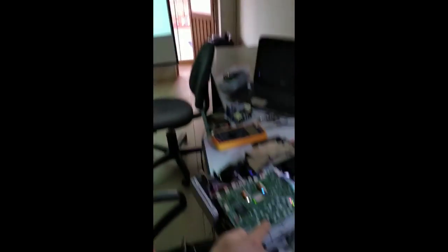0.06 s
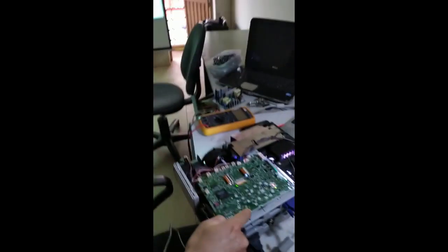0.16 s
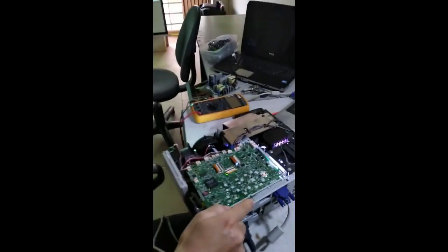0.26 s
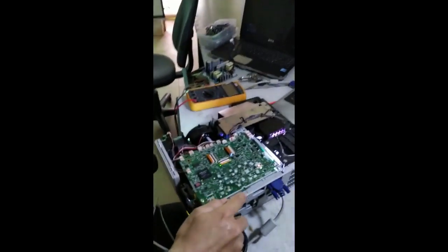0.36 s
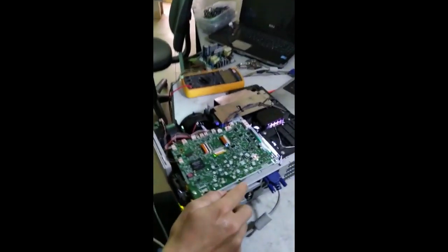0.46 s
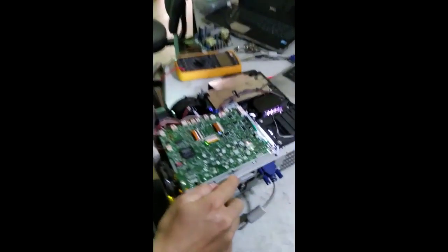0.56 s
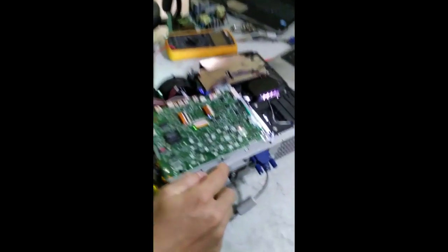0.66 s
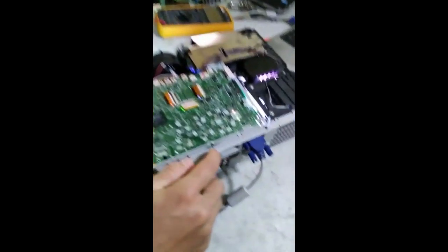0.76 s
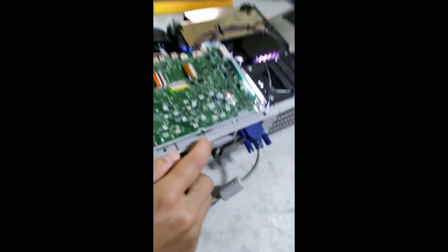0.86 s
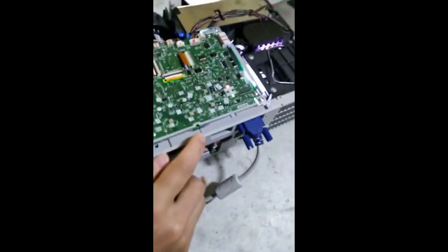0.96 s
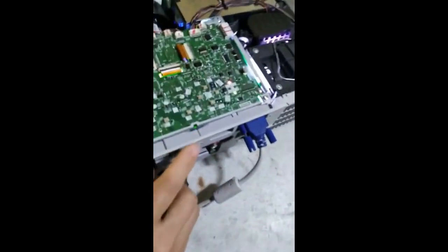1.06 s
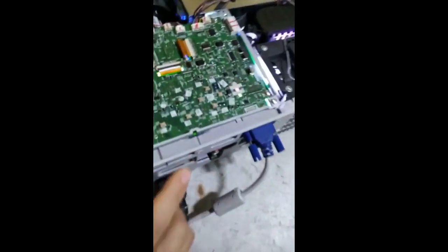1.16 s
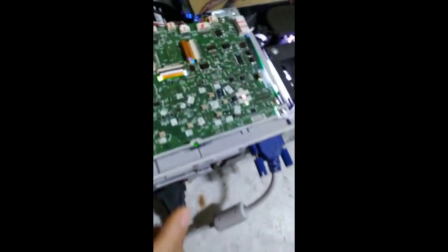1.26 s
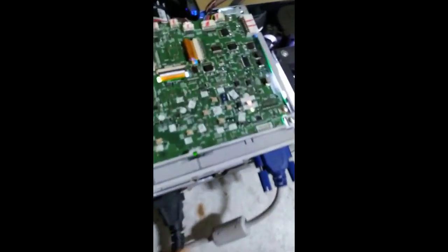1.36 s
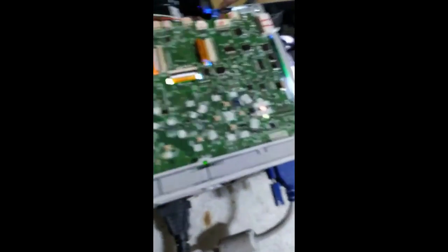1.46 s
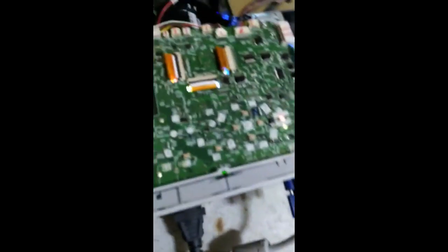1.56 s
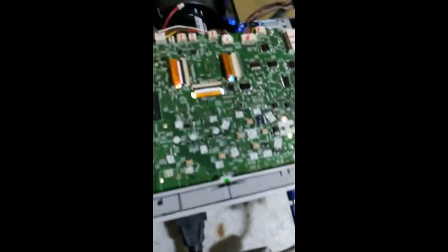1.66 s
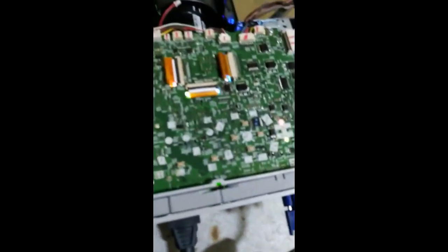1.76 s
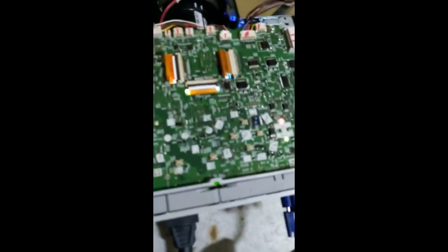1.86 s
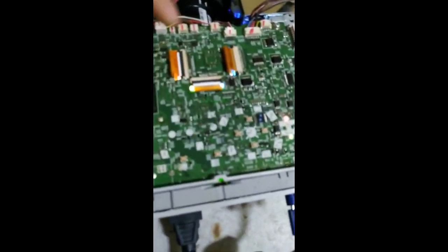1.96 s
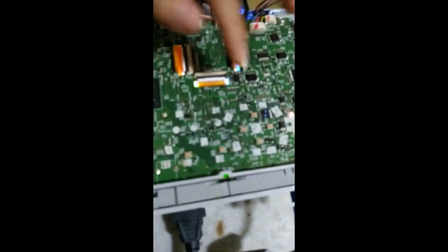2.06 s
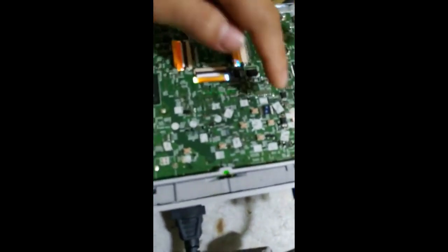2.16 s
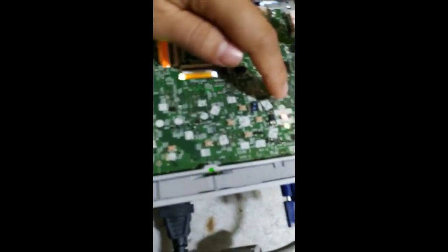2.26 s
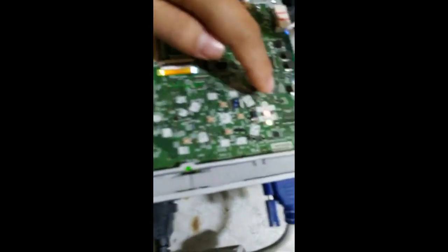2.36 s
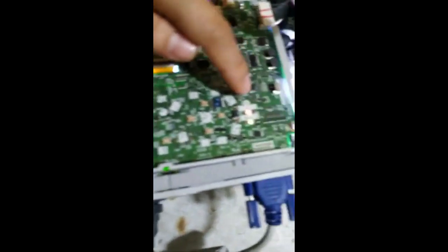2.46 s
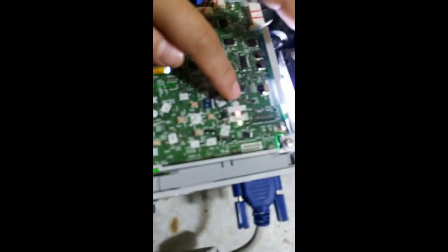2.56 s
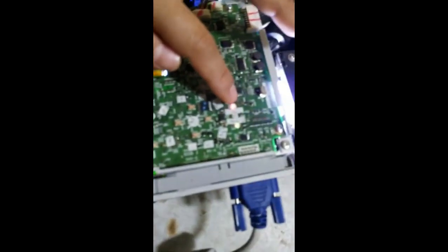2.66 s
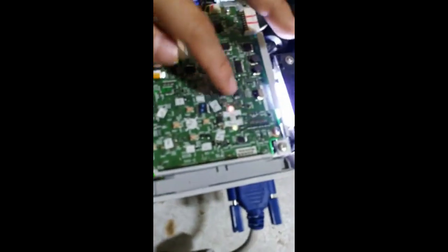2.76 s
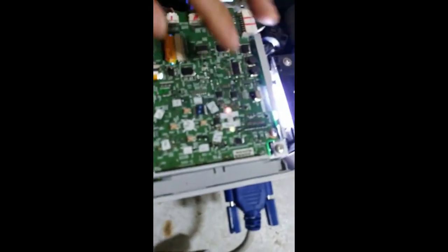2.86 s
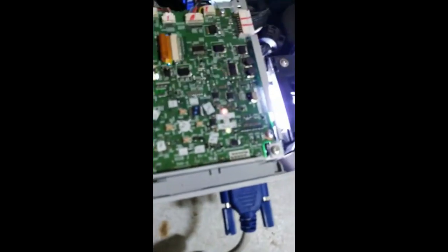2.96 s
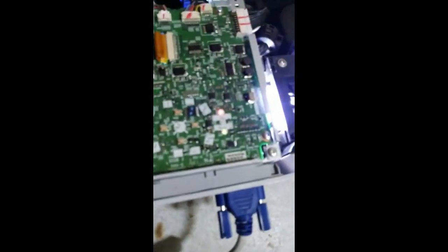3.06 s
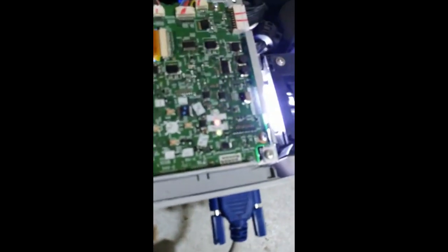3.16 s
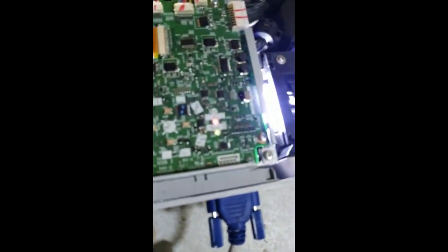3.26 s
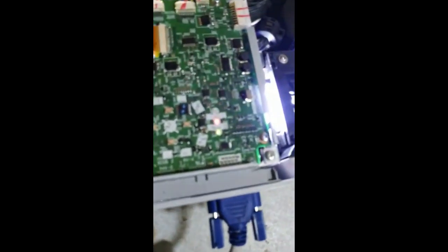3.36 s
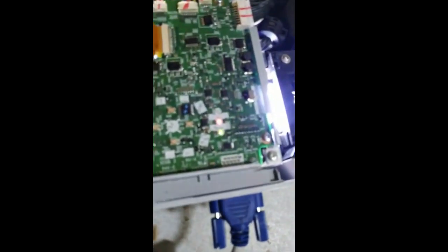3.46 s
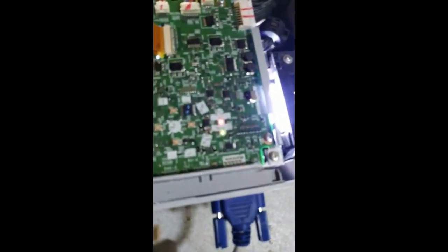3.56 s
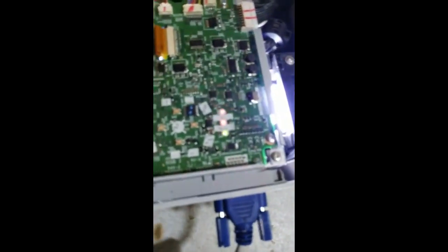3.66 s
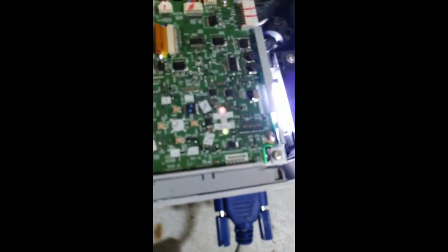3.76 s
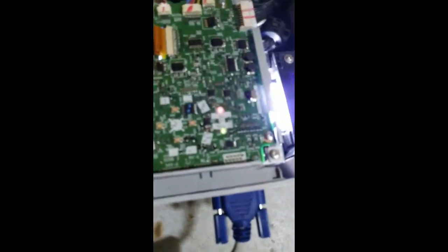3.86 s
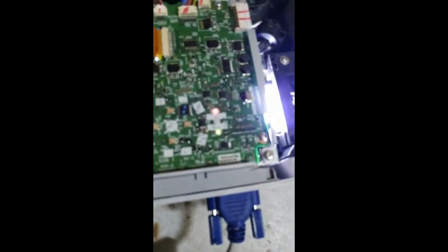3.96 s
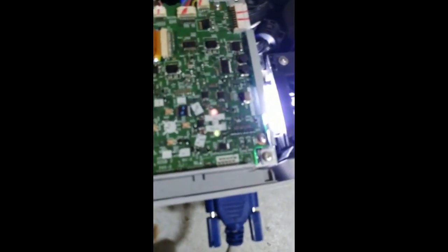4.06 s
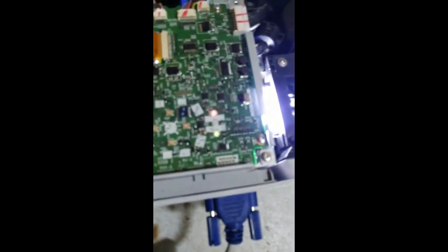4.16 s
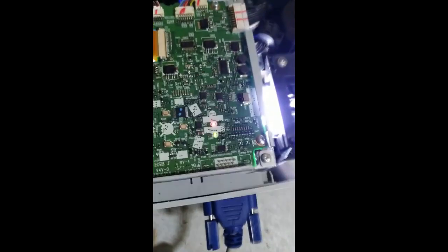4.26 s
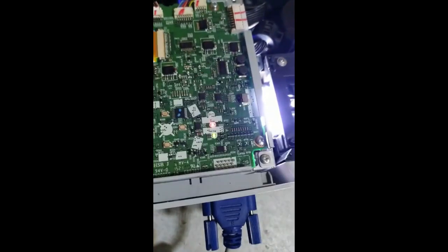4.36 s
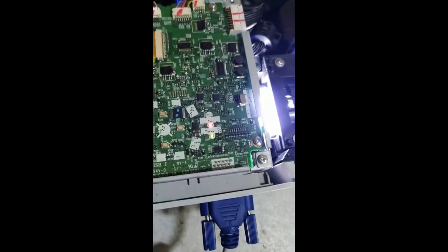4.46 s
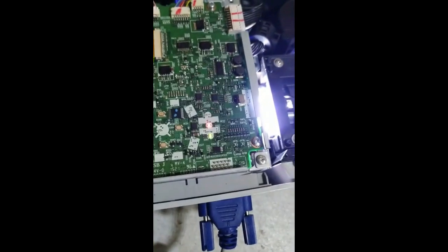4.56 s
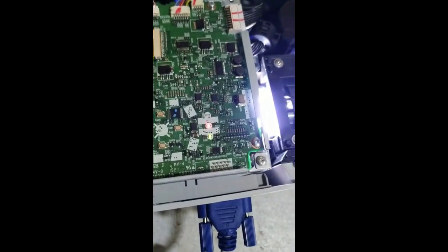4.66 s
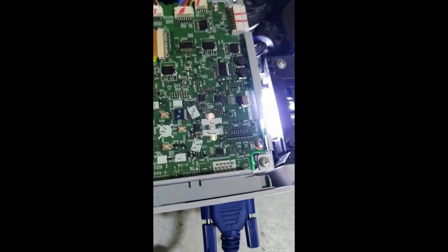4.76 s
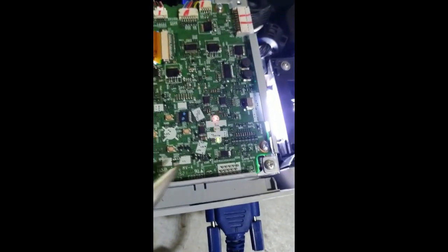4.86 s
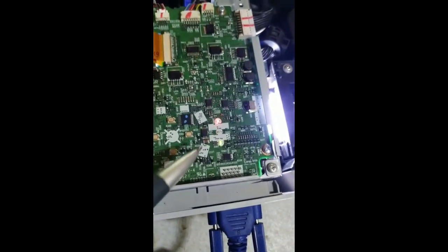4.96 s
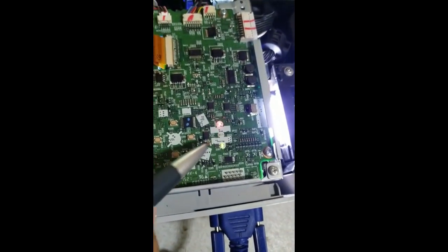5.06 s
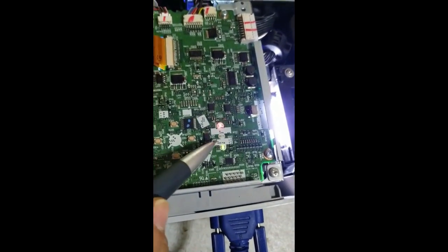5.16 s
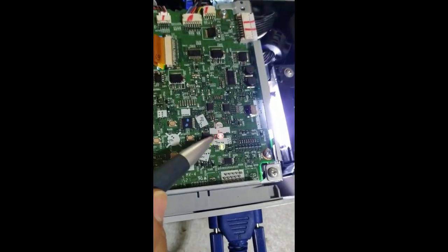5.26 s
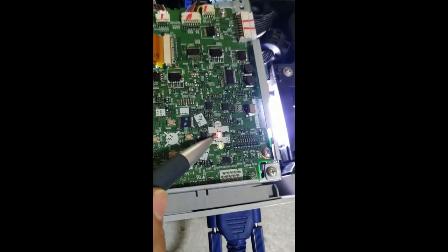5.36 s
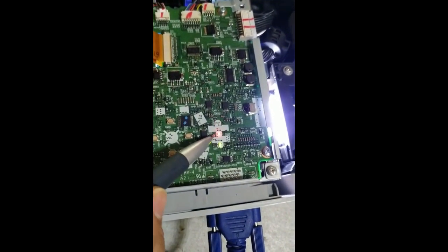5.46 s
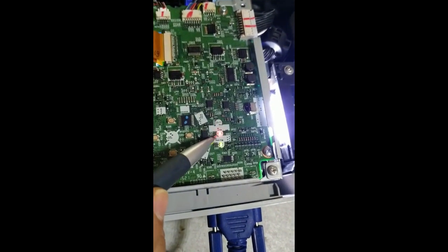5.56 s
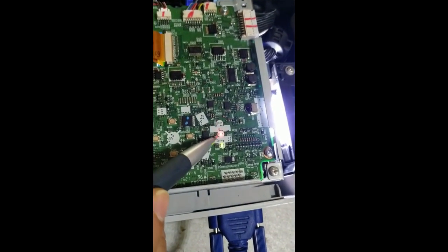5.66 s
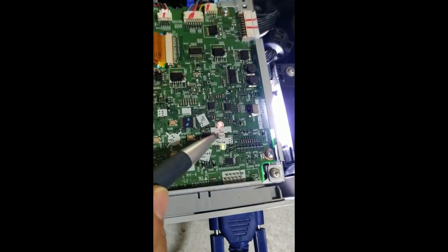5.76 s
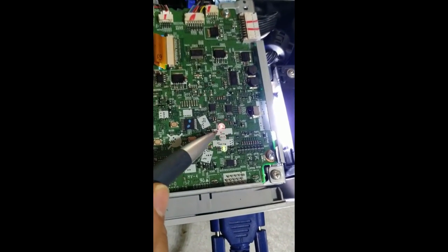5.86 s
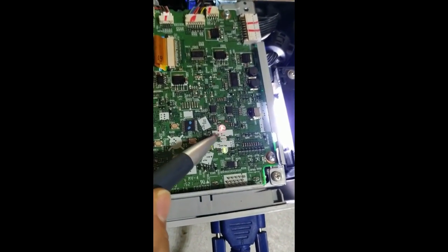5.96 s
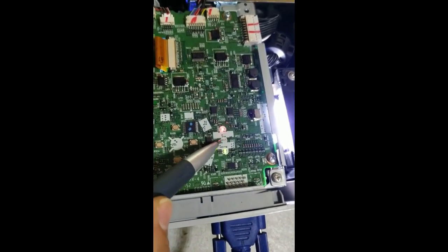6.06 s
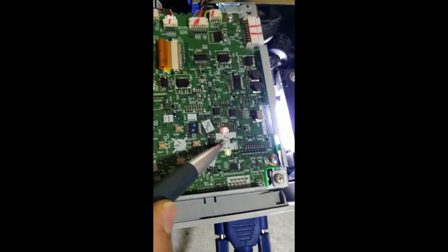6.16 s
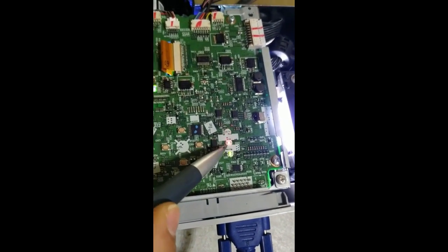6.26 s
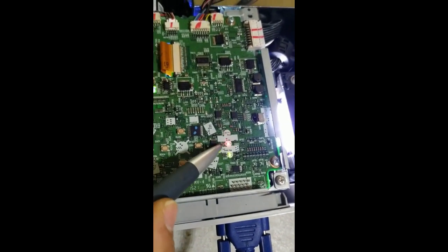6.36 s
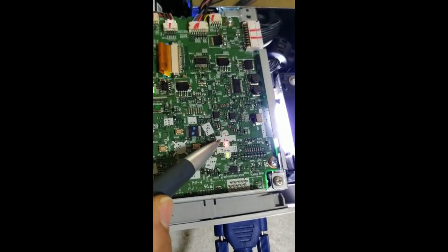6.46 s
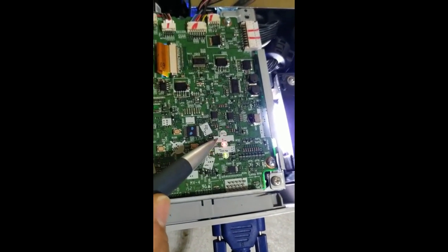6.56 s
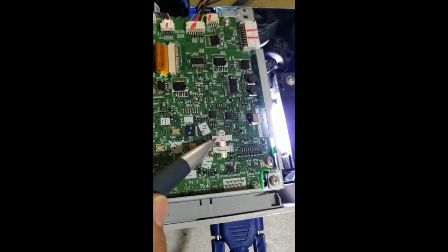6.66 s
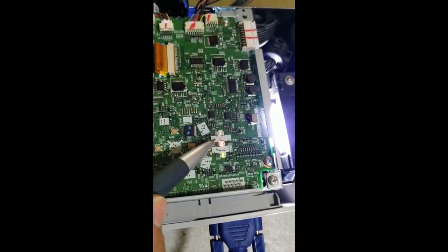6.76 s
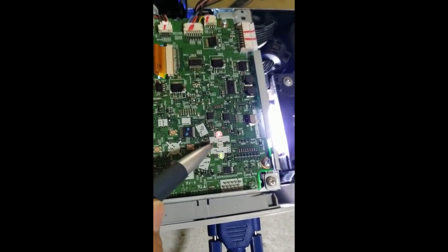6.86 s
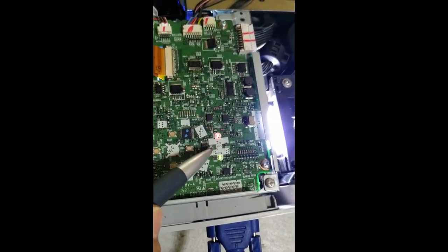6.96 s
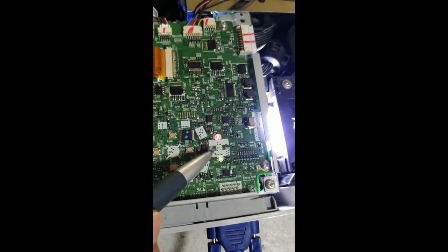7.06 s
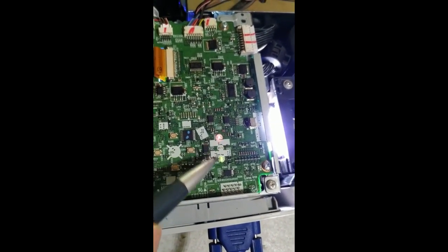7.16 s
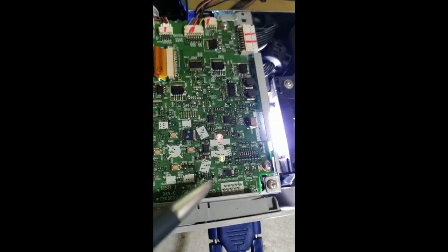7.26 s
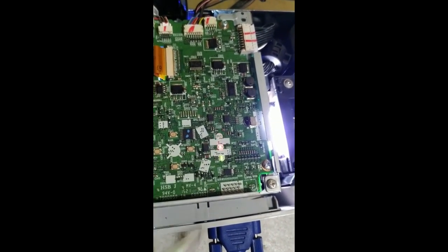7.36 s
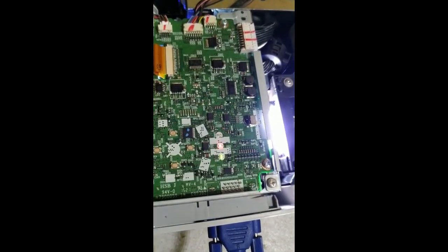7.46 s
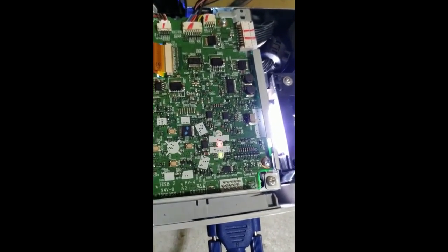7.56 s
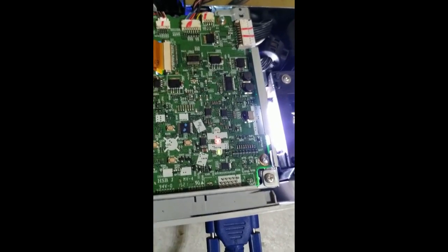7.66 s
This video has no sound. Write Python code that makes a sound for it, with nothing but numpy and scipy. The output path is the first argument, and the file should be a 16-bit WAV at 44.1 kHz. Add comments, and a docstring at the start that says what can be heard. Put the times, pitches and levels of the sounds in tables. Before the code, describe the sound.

The cooling fans of an opened projector run throughout on a workshop bench, heard close on a hand-held phone: a steady rush of air with faint higher tones over a deep rumble. Soft plastic ticks come around 0.5 seconds, then a dull handling bump and a sleeve rustle just after 1 second. From about 1.5 seconds the air is a little louder and a low, throbbing motor hum swells, wavering in level. Small ticks follow at 1.7 and 2.5 seconds, with faint rustles and scuffs between 3 and 4 seconds. Near 4 seconds one light plastic click stands out, followed at once by a very brief, high hiss of something slipping. The fan tones then grow a little clearer. Around 5 seconds the hum sags slightly and recovers. It eases off toward the end as the fans continue, with a last soft rustle at 7.5 seconds.

```python
"""An opened projector runs on a workshop bench as a hand-held phone moves in over its board.
From the start its fans give a rush of air and faint tones above a deep rumble. Plastic parts tick,
a sleeve rustles, and from about 1.5 s a slow motor throbs through the room's standing waves.
Near 4 s comes one light click, then a brief hiss as something slips. Beside the lamp the fan tones
grow clearer; near 5 s the motor sags and recovers, and the hand rests until a last rustle at 7.5 s."""
import sys
import numpy as np
from scipy import signal
from scipy.fft import rfft, irfft
from scipy.io import wavfile

SR = 44100
rng = np.random.default_rng(int(sys.argv[2]) if len(sys.argv) > 2 else 0)


def int16_out(signal):
    """Quantize to a 16-bit WAV file."""
    q = np.round(np.clip(np.atleast_2d(signal).T, -1, 1) * 32767)
    wavfile.write(sys.argv[1], SR, q.astype(np.int16))


N = 339966
TIME = np.arange(N) / SR

# cavity modes of the open case: (frequency [Hz], bandwidth [Hz], gain [dB])
CASE_MODES = [(2630, 260, -8), (4820, 1200, -26), (6040, 170, -30)]
# how strongly those modes colour the sound at the phone: (time [s], gain [dB])
CASE_COUPLING = [(0, -1), (.8, -3.5), (1.3, -3.5), (2.8, -1), (3.4, -5), (4.4, -2), (5.2, -10), (7.7, -3)]


def motor(turn_hz=17.88, sag_hz=.56, stumble_hz=.55, flutter_db=.4, fade_db=2, lamp_db=-5.5):
    """Beating: a rotor's orders, the multiples of its turning rate, add up to one throb each turn."""
    # 5th order, the main tone, as the phone moves: (time [s], level [dB])
    fifth_levels = [(0.0, -61), (0.68, -50), (1.13, -51), (1.54, -37), (1.9, -34), (2.06, -36), (2.49, -31),
                    (3.33, -35.5), (3.56, -41.5), (3.88, -31.5), (4.35, -36.5), (5.26, -36), (5.56, -30.5),
                    (6.05, -36), (6.42, -46.5), (7.14, -36.5), (7.69, -41)]
    # 6th order, which beats against it: (time [s], level [dB])
    sixth_levels = [(0.0, -61), (0.43, -50.5), (0.73, -57), (0.98, -45.5), (2.18, -37.5), (3.31, -48),
                    (3.74, -38), (4.56, -39.5), (5.06, -72), (5.17, -48.0), (5.37, -55), (5.96, -38),
                    (6.49, -46), (6.87, -42.5), (7.69, -60.6)]
    # 7th order, booming while the phone rests in its standing wave: (time [s], level [dB])
    seventh_levels = [(0.0, -60.7), (0.79, -51), (0.91, -55), (1.18, -48), (1.45, -52), (2.13, -53),
                      (2.43, -48), (2.7, -49), (3.27, -46.7), (3.51, -39), (4.97, -35.5), (5.19, -47.5),
                      (6.35, -48), (6.78, -59), (7.69, -58)]
    # 17th order, a clean overtone: (time [s], level [dB])
    overtone_levels = [(0.0, -99), (1.04, -56), (1.61, -55), (2.06, -43), (2.45, -57), (2.7, -46),
                       (3.27, -46.5), (3.42, -55.5), (4.17, -51.5), (4.31, -54), (4.94, -46.5), (5.15, -61),
                       (5.6, -49.5), (5.71, -55.5), (6.17, -47), (7.17, -55), (7.35, -48), (7.69, -61)]
    # faint harmonics of the hum: (order [-], base level [dB])
    weak_orders = [(3, -68), (9, -66), (10, -67), (11, -61.5), (12, -68), (13, -69), (14, -66), (21, -69),
                   (22, -63)]
    speed = turn_hz - sag_hz * swell(TIME, 5.1, 1.6) - stumble_hz * swell(TIME, 5.2, .2)
    angle = 2 * np.pi * np.cumsum(speed) / SR
    fifth, sixth, seventh = curve(fifth_levels), curve(sixth_levels), curve(seventh_levels)
    orders = {4: fifth - 16, 5: fifth, 6: sixth, 7: seventh, 8: seventh - 11}
    # over the board the 6th order and its neighbours drift out of step: the throb blurs to a flutter
    drift = 1.3 * rise(2.65, .4) - 2.9 * rise(3.55, .15)
    hum = sum(undb(db + flutter_db * walk(6)) * np.cos(k * angle + drift * (k != 6))
              for k, db in orders.items())
    hum += undb(curve(overtone_levels) + flutter_db * walk(6)) * np.cos(17 * angle + .35 * walk(3))
    # weak orders follow the two main tones, drop beside the lamp and fade across standing waves
    main_db = 20 * np.log10(np.hypot(undb(fifth), undb(sixth)))
    shift_db = .5 * (main_db - main_db.mean()) + lamp_db * rise(4.3, .71)
    hum += sum(undb(db + fade_db * walk(.66) + shift_db) * np.cos(k * angle + 2 * walk(.55))
               for k, db in weak_orders)
    return np.sqrt(2) * (hum + standing_waves(angle) + buzz(speed, angle))


def standing_waves(angle):
    """Interference: each standing wave that the phone crosses lifts one motor order to a clean tone."""
    # crossings: (centre time [s], duration [s], order [-], peak level [dB])
    antinodes = [(2.25, .25, 19, -55), (2.3, .25, 22, -54), (3.75, .28, 14, -53), (4.62, .25, 16, -51),
                 (5.65, .4, 14, -53.5)]
    return sum(undb(db) * swell(TIME, s, length) * np.sin(k * angle) for s, length, k, db in antinodes)


def buzz(speed, angle, resonance_hz=303, width_hz=25, fade_db=2, gain_db=-2.3):
    """Close motor orders beat into a buzz; a resonance favours whichever passes through it."""
    # the orders on both sides of the 17th, together: (time [s], relative level [dB])
    levels = [(0.0, -58), (1.2, -46.5), (1.68, -55), (2.36, -44.5), (2.59, -54), (2.88, -43), (3.58, -49.5),
              (3.76, -46.5), (4.76, -52), (4.9, -56), (5.08, -42), (5.31, -58.5), (5.6, -50.5),
              (7.69, -61.5)]
    weights = {k: undb(fade_db * walk(2)) / np.hypot(1, 2 * (k * speed - resonance_hz) / width_hz)
               for k in (15, 16, 18, 19)}
    cluster = sum(weight * np.cos(k * angle + 1.2 * walk(.6)) for k, weight in weights.items())
    total_weight = np.sqrt(sum(weight ** 2 for weight in weights.values()))
    return undb(curve(levels) + gain_db) * cluster / total_weight


def fans(air_db=4, case_db=14, flicker_db=.5, duct_hz=3770, duct_width_hz=360, duct_db=2):
    """Turbulence makes broadband noise, coloured by resonances of the case and the lamp's cooling duct."""
    # rushing air: (frequency [Hz], relative spectral density [dB])
    air_spectrum = [(22, 12), (36, 3.5), (65, 4), (120, 4), (215, -3.8), (300, -3), (440, -3.5),
                    (530, -2.3), (630, -3.2), (790, -1.6), (1000, -5), (1270, -8), (1550, -8.6),
                    (2000, -11.3), (3600, -17), (4200, -23), (11500, -31), (15500, -27.3)]
    # nearness of the fan outlets: (time [s], gain [dB])
    nearness = [(0.0, -51.5), (0.51, -51), (1.37, -47.5), (2.92, -47.5), (3.2, -47), (4.12, -47),
                (4.47, -48), (7.71, -48.5)]
    air = unit(colour(rng.standard_normal(N), air_spectrum)) * undb(flicker_db * walk(3.2))
    case = ring(rng.standard_normal(N), CASE_MODES) * undb(curve(CASE_COUPLING) + case_db)
    duct = noise_band(duct_hz, duct_width_hz) * undb(duct_db) * at_lamp()
    return undb(curve(nearness)) * (undb(air_db) * air + case + duct)


def blade_tones(flutter_db=1.4, far_db=-4.5):
    """Turbulence modulates the fans' tones in pitch and level; they are clearest beside the lamp."""
    # fan tones and a thin whine: (frequency [Hz], level at the lamp [dB], wander [Hz])
    tones = [(497.5, -58, 3.2), (879.5, -61, 1.2), (1012, -70, 2.5), (1174, -64.5, 2), (1336, -65, 2),
             (1466, -59.3, 1), (2139, -74, 2), (2346, -73, 2), (2639, -74, 2.5), (8915, -88, 4),
             (9044, -84, 3)]
    out = 0
    for hz, db, wander_hz in tones:
        out += wavering_tone(hz + wander_hz * walk(9), db + flutter_db * walk(6))
    return out * undb(far_db * (1 - at_lamp()))


def clicks(room_db=-15, room_decay_s=.03, tail_db=-17, tail_decay_s=.085, snap_db=-11, note_width_hz=1300):
    """Impacts excite the modes of plastic parts; the room reverberates, its lows lasting longest."""
    # (time [s], level [dB], tilt [dB/octave], contact [s], ring gain [dB], note [Hz], note gain [dB])
    impacts = [(0.435, -48.5, -3.5, .008, -28, 6500, -2), (.62, -50.5, -3.5, .004, -24, 6100, -2),
               (1.124, -46.5, -3.5, .005, -22, 7000, -12), (1.159, -50.5, -1, .016, -24, 6450, -1),
               (1.6699, -43.5, 0, .006, -28, 11400, -9), (1.684, -44.5, -4, .01, -24, 7900, -8),
               (2.51, -44.6, 1, .0091, -25, 11200, -20), (2.588, -54, 2, .008, -18, 11200, -14),
               (3.9632, -28.6, -1.4, .0058, -2, 11300, -7), (3.975, -44, 0, .007, -6, 9400, -8),
               (3.989, -44, -1.5, .006, -4, 9400, -6), (4.093, -47.5, 0, .007, -8, 11300, -8)]
    # modes of the plastic: (frequency [Hz], bandwidth [Hz], gain [dB])
    plastic_modes = [(576, 50, 3), (850, 170, 11.5), (1450, 300, 10.5), (2050, 300, 2), (2580, 400, 2.5),
                     (3580, 300, 9.5), (4170, 260, 6), (4600, 260, 6.5), (5400, 300, -3), (6200, 200, -7),
                     (6750, 300, -4), (9300, 700, -6)]
    out, t = np.zeros(N + SR), TIME[:SR // 2]
    for s, db, slope_db, contact_s, ring_db, note_hz, note_db in impacts:
        chatter, echo, tail = rng.standard_normal((3, len(t)))
        drive = chatter * np.exp(-(t / contact_s) ** 2)
        drive += undb(room_db) * echo * np.exp(-t / room_decay_s)
        drive += undb(tail_db) * lowpass(tail, hz=3500) * np.exp(-t / tail_decay_s)
        snap = undb(snap_db) * lowpass(drive, hz=13000)
        body = undb(ring_db) * ring(drive, plastic_modes)
        touched_part = undb(note_db) * resonate(drive, note_hz, note_width_hz)
        hit = tilt(snap + body + touched_part, slope_db) * (t < t[-1] / 2)
        contact_rms = np.sqrt(np.sum(hit ** 2) / (contact_s * SR))
        start = int(s * SR)
        out[start:start + len(t)] += undb(db) * hit / contact_rms
    return out[:N]


def sleeve(grain_db=.3, case_db=17, stir_db=-63, rest_s=5.08):
    """Friction: cloth and fingers catch unevenly as they slide, and excite the modes of the open case."""
    # strokes: (centre time [s], duration [s], level [dB], tilt [dB/octave], scrape gain [dB])
    strokes = [(1.165, 0.048, -49, -5, -12), (1.24, 0.11, -56.5, -1.5, -12), (1.44, 0.12, -55.3, 1, -1),
               (2.116, 0.17, -58, 2, -9), (3.03, 0.1, -61, 2, -10), (3.625, 0.12, -55.7, 4, -26),
               (3.834, 0.15, -53.8, 2.5, -22), (4.037, .12, -49, -12.5, -20), (4.085, .08, -58, 9, -20),
               (4.5, .3, -66, 8, -12), (7.44, 0.23, -58, -1.5, -20), (7.52, 0.11, -56.7, 7, -20)]
    # rubbed cloth: (frequency [Hz], relative spectral density [dB])
    cloth_spectrum = [(500, -7), (1500, 2.5), (3500, 7), (5500, 5), (7300, 5.5), (10800, 2.8), (13000, 1),
                      (16000, -2)]
    # modes of the scraped case: (frequency [Hz], bandwidth [Hz], gain [dB])
    scrape_modes = [(3850, 300, 11), (4550, 200, 10), (6280, 350, 13), (7950, 420, 15), (9650, 600, 7),
                    (13100, 700, 4)]
    friction = rng.standard_normal(N) * undb(grain_db * walk(300))
    case = undb(case_db + curve(CASE_COUPLING)) * ring(friction, CASE_MODES)
    rustle = colour(friction, cloth_spectrum) + case
    scrape = ring(friction, scrape_modes)
    # between strokes the sleeve stirs faintly, until the hand comes to rest
    out = undb(stir_db + walk(2.3)) * (1 - rise(rest_s, .26)) * unit(rustle)
    for s, length, db, slope_db, scrape_db in strokes:
        stroke = unit(tilt(rustle + undb(scrape_db) * scrape, slope_db))
        out += undb(db) * swell(TIME, s, length) * stroke
    return out


def slip(from_s=4.091, to_s=4.113, edge_s=.002, db=-46.5, above_hz=8800, grain_db=3):
    """Sliding friction gives a high, gritty hiss as something slips just after the loudest click."""
    friction = rng.standard_normal(N) * undb(grain_db * walk(400))
    highpass = signal.butter(6, above_hz, "highpass", fs=SR, output="sos")
    hiss = signal.sosfilt(highpass, friction + resonate(friction, hz=9600, width_hz=700))
    return undb(db) * unit(hiss) * rise(from_s, edge_s) * (1 - rise(to_s, edge_s))


def handling():
    """Soft contacts carry little treble: hands bump and scuff the phone and the case dully."""
    # contacts: (centre time [s], duration [s], frequency [Hz], bandwidth [Hz], level [dB])
    scuffs = [(.441, .012, 1100, 900, -51), (.628, .014, 2150, 600, -55), (1.08, .2, 20, 6, -35.5),
              (.88, .16, 34, 20, -52), (1.045, .025, 490, 170, -42), (1.1, .07, 460, 160, -47.5),
              (1.693, .018, 730, 260, -44), (1.693, .02, 1400, 800, -47.5), (3.205, .07, 750, 60, -49),
              (3.34, .08, 520, 140, -54), (3.95, .2, 36, 20, -54), (4.03, .12, 300, 220, -53)]
    out = 0
    for s, length, hz, width_hz, db in scuffs:
        rub = noise_band(hz, width_hz)
        envelope = swell(TIME, s, length)
        contact_rms = np.sqrt(np.average(rub ** 2, weights=envelope ** 2))
        out += undb(db) * envelope * rub / contact_rms
    return out


def rumble(hz=22.2, db=-55.5, wander_hz=.8):
    """Random modulation of a tone at the lower limit of hearing makes a deep shudder in the room."""
    level_db = db + .82 * walk(2.8)
    return wavering_tone(hz + wander_hz * walk(17), level_db)


def at_lamp():
    """Nearness of the phone to the lamp and its duct, from 0 to 1."""
    return rise(4.2, 1)


def undb(db):
    """Decibels to amplitude ratio."""
    return 10 ** (np.asarray(db) / 20)


def unit(x):
    """Normalisation to an rms of 1."""
    return x / np.sqrt(np.mean(x ** 2))


def curve(points):
    """Linear interpolation of (time [s], level [dB]) points."""
    return np.interp(TIME, *np.transpose(points))


def swell(t, middle, length):
    """A Gaussian envelope with a peak of 1."""
    return np.exp(-2 * ((t - middle) / length) ** 2)


def rise(s, edge_s):
    """A smooth step from 0 to 1, centred on time s."""
    return .5 + .5 * np.tanh((TIME - s) / edge_s)


def walk(rate_hz):
    """Random fluctuation with an rms of 1, mostly slower than rate_hz."""
    size, control_hz = 16384, 2000
    f = np.fft.rfftfreq(size, 1 / control_hz)
    slow = irfft(rfft(rng.standard_normal(size)) * np.exp(-(f / rate_hz) ** 2))
    slow = np.interp(TIME, np.arange(size) / control_hz, slow)
    return unit(slow - slow.mean())


def wavering_tone(hz, db):
    """A sinusoid of rms level db, its phase the integral of frequency."""
    return np.sqrt(2) * undb(db) * np.sin(2 * np.pi * np.cumsum(hz) / SR)


def colour(x, points):
    """Spectral shaping by (frequency [Hz], gain [dB]) points."""
    hz, db = np.transpose(points)
    f = np.fft.rfftfreq(len(x), 1 / SR) + 1
    return irfft(rfft(x) * undb(np.interp(np.log(f), np.log(hz), db)), len(x))


def tilt(x, slope_db):
    """Spectral tilt of slope_db per octave above 500 Hz, pivoting at 4 kHz."""
    octaves = np.log2(np.maximum(np.fft.rfftfreq(len(x), 1 / SR), 500) / 4000)
    return irfft(rfft(x) * undb(slope_db * octaves), len(x))


def lowpass(x, hz):
    """Second-order roll-off above hz."""
    return signal.lfilter(*signal.butter(2, hz, fs=SR), x)


def resonate(x, hz, width_hz):
    """A damped resonator with a gain of 1 at its centre."""
    return signal.lfilter(*signal.iirpeak(hz, hz / width_hz, fs=SR), x)


def noise_band(hz, width_hz):
    """White noise through two equal resonators in series."""
    return resonate(resonate(rng.standard_normal(N), hz, width_hz), hz, width_hz)


def ring(x, modes):
    """Modal superposition: a body responds as the sum of its resonances."""
    return sum(undb(db) * resonate(x, hz, width_hz) for hz, width_hz, db in modes)


def scene():
    """Superposition: the pressures of all sources add at one microphone."""
    return (motor() + fans() + blade_tones() + sleeve() + slip() + clicks() + rumble() + handling())[None]


def record(dry):
    """Band limiting: the phone cuts the highest treble steeply."""
    cutoff_hz = 15750
    return signal.sosfilt(signal.ellip(10, .2, 70, cutoff_hz, fs=SR, output="sos"), dry)


dry = scene()
out = record(dry)
int16_out(out)
```